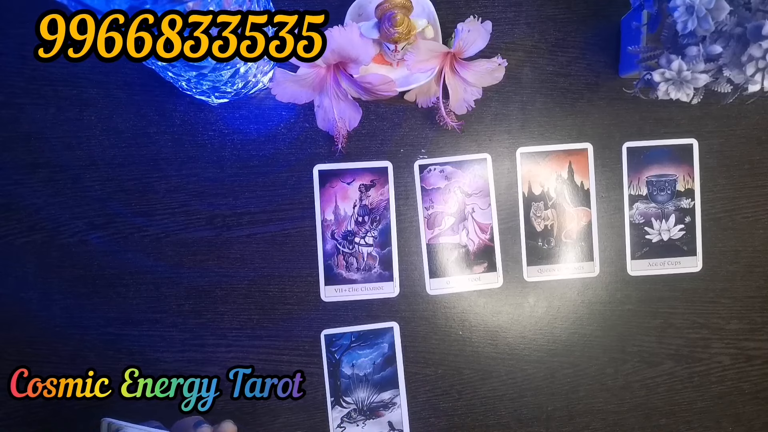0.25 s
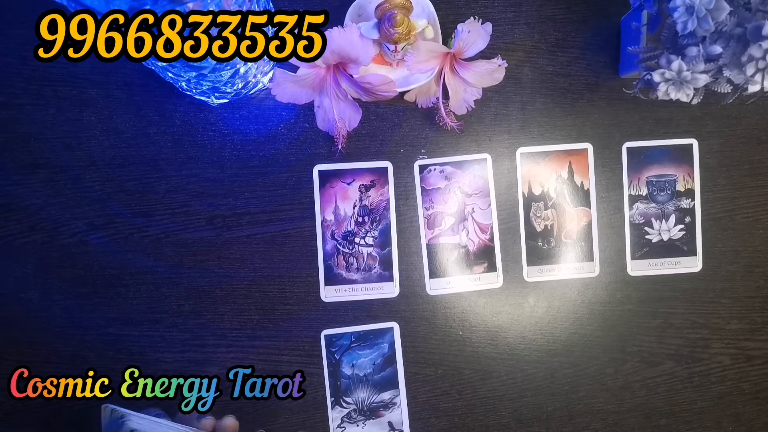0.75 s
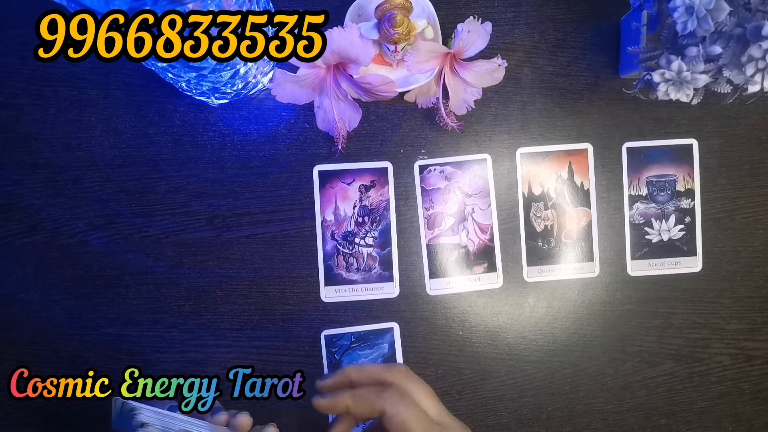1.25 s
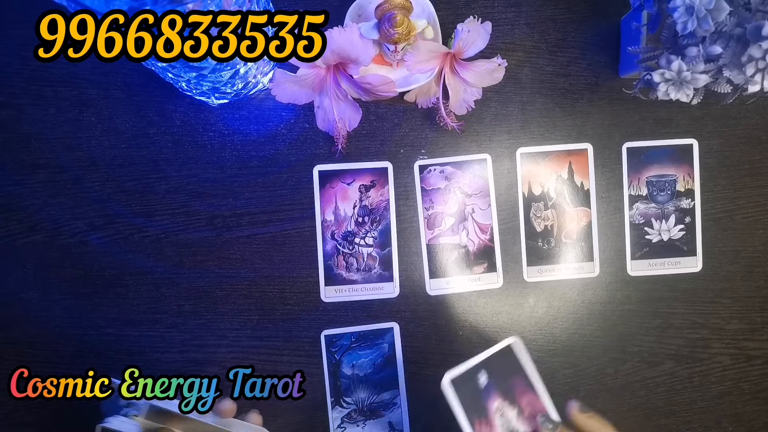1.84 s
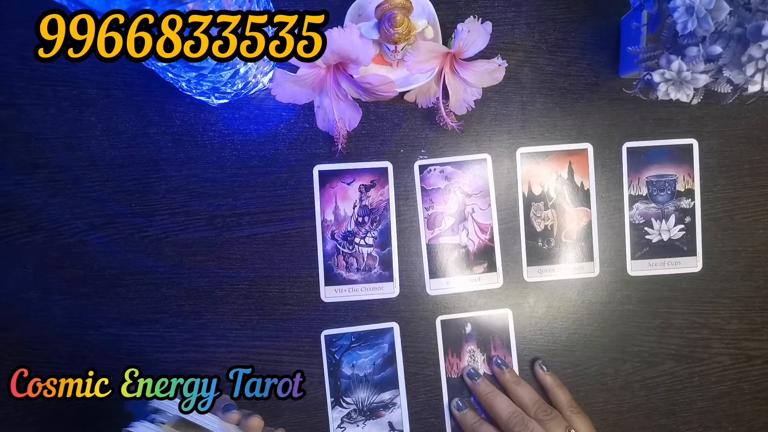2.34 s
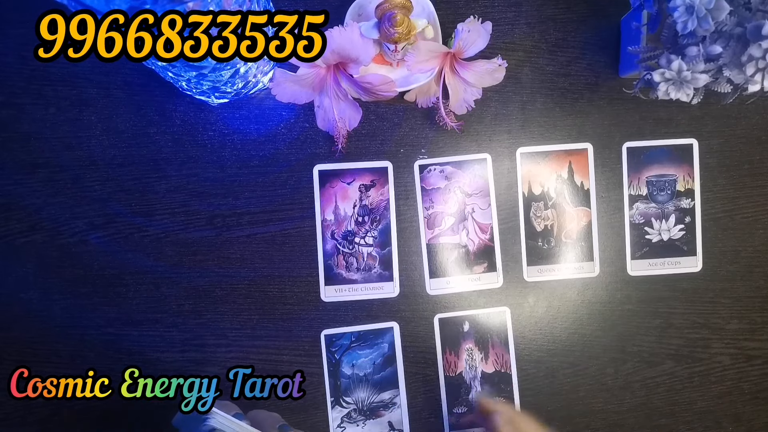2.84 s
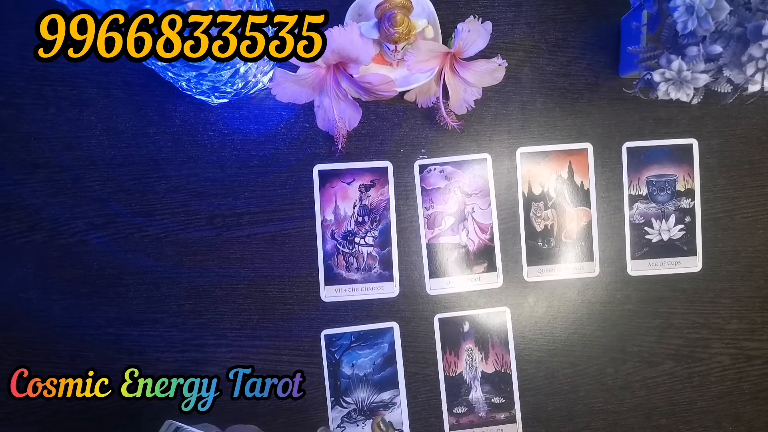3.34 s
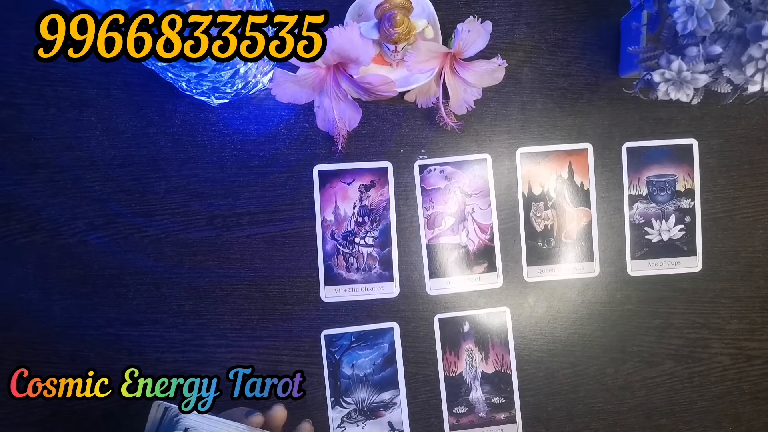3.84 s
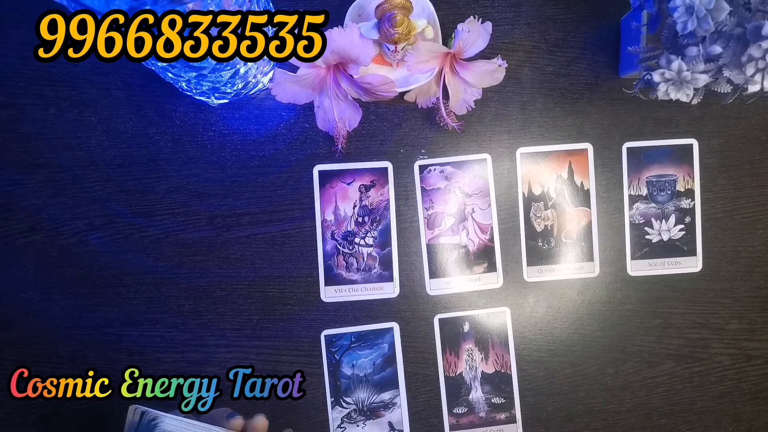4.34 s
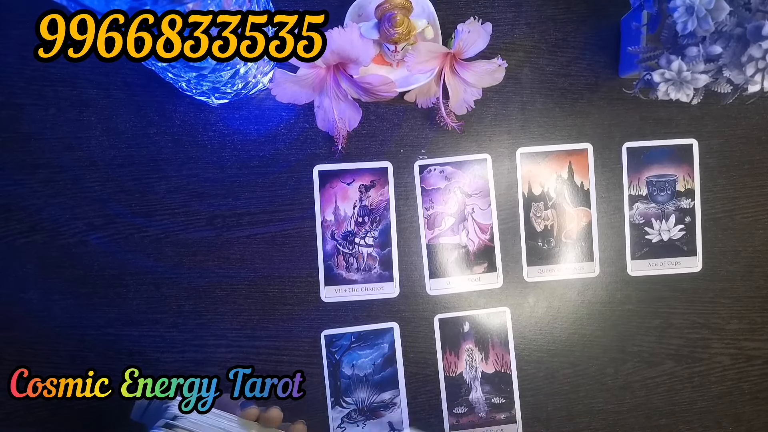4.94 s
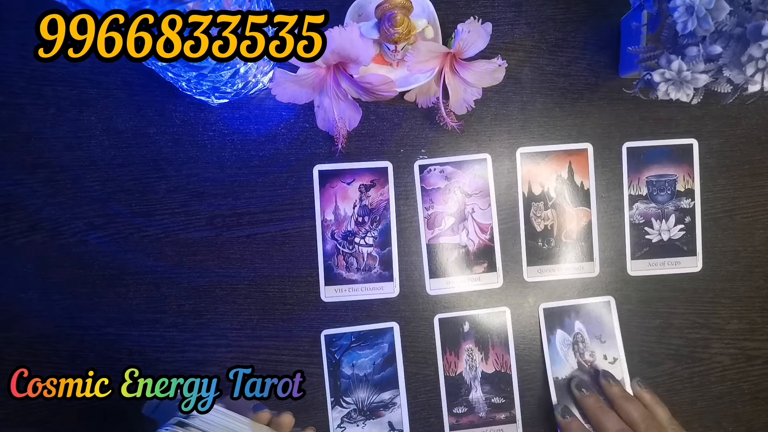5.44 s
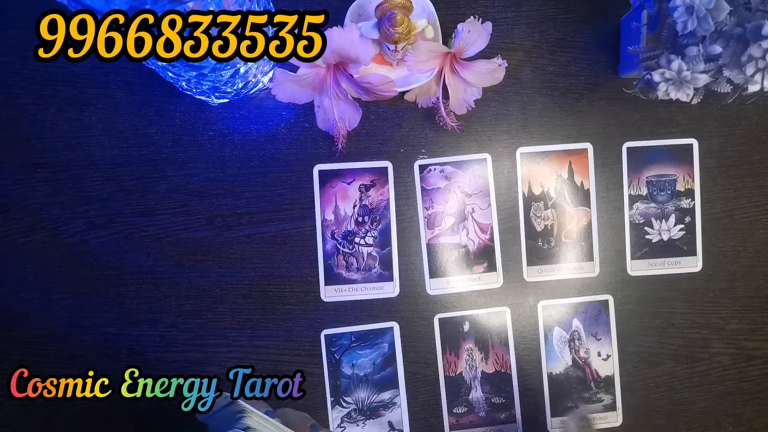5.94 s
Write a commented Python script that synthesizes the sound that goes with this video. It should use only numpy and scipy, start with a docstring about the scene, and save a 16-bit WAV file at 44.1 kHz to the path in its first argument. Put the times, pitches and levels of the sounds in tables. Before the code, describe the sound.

In a small room, a faint ceiling fan rushes steadily while its draught buffets a close stereo microphone with low, fluttering thumps, stronger on the right. A sharp card snap comes early with a papery slide, then lighter snaps and scrapes on a wooden table, another crisp pair near the five-second mark, and a few soft ones before only fan and draught remain.

```python
"""A ceiling fan hums and rushes throughout; from the first moments its draught hits two microphone ports.
The puffs are short pressure swings over a patter of small eddies, mostly stronger in the right port.
Soon playing cards slide (gritty noise through resonances) and snap (short noise bursts ringing the card)
on a wooden table in a small room, on and off until near the end. Fan and draught then carry on alone."""
import sys
import numpy as np
from scipy import signal
from scipy.fft import rfft, irfft
from scipy.io import wavfile
from scipy.ndimage import uniform_filter1d

SR = 44100
rng = np.random.default_rng(int(sys.argv[2]) if len(sys.argv) > 2 else 0)


def wav_record(signal):
    """Record a signal, one row per channel, as 16-bit PCM in the file named by sys.argv[1]."""
    frames = np.transpose(np.atleast_2d(signal))
    bounded = np.clip(frames, -1, 1)
    # unit amplitude maps onto the largest positive 16-bit level
    quanta = np.round(bounded * 32767).astype(np.int16)
    wavfile.write(sys.argv[1], SR, quanta)


N = 273420  # length in samples

# Shape of the fan's air rush, before its overall level is set: pitch_hz, level_db (per Hz)
FAN_RUSH = [(24, -46), (40, -16.5), (288, -2), (630, -3), (849, -3.5), (1070, -12), (1280, -10),
            (1940, -10.5), (2230, -8.5), (7190, -22), (9690, -36), (12600, -66.5), (21300, -120)]
# Humps added to the rush: pitch_hz, width_hz, level_db
FAN_HUMPS = [(383.2, 11, 6), (901, 220, 6.5), (1275, 218, 9.5), (2246, 210, 6)]
# How alike the rush is at both ports: pitch_hz, likeness (0 to 1, no unit)
FAN_LIKENESS = [(60, 0), (140, 0.29), (320, 1), (740, 0.889), (1720, 0.12), (3990, 0.0059), (9240, 1)]
# Which side of the rush is louder: pitch_hz, left_minus_right_db
FAN_BALANCE = [(60, -3.5), (160, -1), (450, -3), (1230, -2.0), (3370, -3), (9240, -2)]
# Motor tones of the fan: pitch_hz (average), level_db (rms)
MOTOR_TONES = [(592.2, -81), (888.2, -83.5), (1287, -85.5), (2261, -83.5)]
FAN_DB = -65  # rms level of the rush

# Gusts that carry small eddies: start_s, end_s, left_level_db, right_level_db
GUSTS = [(0.154, .35, -54, -51), (0.402, 0.477, -55.5, -51), (0.554, 0.582, -60, -52.5),
         (.67, 0.775, -52, -53), (.88, 1.147, -63.5, -54.5), (1.276, 1.493, -56.5, -52.5),
         (1.636, 1.785, -58, -54), (1.952, 2, -53, -50.5), (2.096, 2.259, -54.5, -44.5),
         (2.338, 2.434, -63, -48), (2.457, 2.711, -53, -48.5), (2.842, 2.987, -59, -52),
         (3.037, 3.17, -57.5, -55.5), (3.354, 3.454, -59, -45.5), (3.483, 3.652, -60.5, -59),
         (3.742, 3.928, -60.5, -57.5), (4.112, 4.221, -59, -51), (4.321, 4.751, -57, -54.5),
         (4.898, 4.988, -58.5, -52), (5.179, 5.335, -54, -50.5), (5.373, 5.6, -57, -52),
         (5.622, 5.775, -55, -43), (5.82, 5.946, -51, -56), (6.157, 6.3, -64, -57)]
# Strong eddies striking a port: middle_s, port (0 left, 1 right), level_db, pitch_hz (at the middle),
# length_ms (a third of the whole swing)
PUFFS = [(0.147, 1, -38, 164, 7.5), (0.185, 1, -29.5, 203.5, 6.84), (0.327, 1, -25, 232, 4.8),
         (0.44, 0, -44, 169, 7), (0.474, 1, -38, 185, 5.7), (0.675, 1, -26, 188, 1.8),
         (0.684, 1, -17, 210.4, 16), (0.728, 0, -36, 146.4, 8.2), (0.742, 0, -35.5, 151, 9.3),
         (0.945, 1, -17, 182, 6.5), (0.953, 1, -22, 154.5, 6.1), (0.977, 1, -33.5, 143, 30),
         (0.989, 1, -28, 196, 6.3), (1.063, 1, -35.5, 190, 7.3), (1.076, 1, -40.5, 166, 6.76),
         (1.131, 1, -41, 156, 16), (1.27, 1, -34, 158, 13), (1.288, 0, -41, 207, 5.5),
         (1.358, 1, -27, 199, 9.7), (1.373, 1, -32.5, 120, 11.3), (1.404, 1, -30, 197, 4.4),
         (1.661, 0, -36.5, 160, 7.7), (1.795, 1, -39, 202, 5.6), (1.966, 0, -42, 162, 10),
         (2.113, 1, -20.5, 241, 4.3), (2.133, 1, -20.5, 236.4, 4.4), (2.208, 1, -21.5, 149.3, 10.3),
         (2.219, 1, -35, 163, 13), (2.244, 1, -21, 217.3, 4.4), (2.38, 1, -33.5, 197, 8.2),
         (2.405, 1, -35, 228.5, 10.6), (2.46, 1, -31.5, 190, 4.8), (2.472, 1, -31, 180, 5.7),
         (2.494, 1, -20, 232, 2.52), (2.554, 0, -42, 159, 12), (2.64, 1, -29, 210, 6.4),
         (2.694, 1, -29, 227, 6), (2.795, 1, -30, 185.8, 6.7), (2.943, 1, -27.5, 167.8, 30),
         (2.966, 1, -13.5, 246, 6.3), (2.969, 0, -31, 149, 5.8), (3.099, 1, -31, 187, 8.85),
         (3.116, 1, -35, 194.6, 7.6), (3.335, 1, -39, 210, 6), (3.355, 1, -26, 148.5, 6.1),
         (3.365, 1, -10, 199, 3.9), (3.385, 1, -32, 287, 6.2), (3.402, 0, -37.5, 170, 11),
         (3.413, 1, -18.5, 200.8, 6.2), (3.425, 1, -26, 187, 13), (3.499, 0, -38.5, 140, 7.4),
         (3.774, 0, -29.5, 169.3, 7), (3.79, 1, -30.5, 199, 7.7), (3.812, 1, -35.5, 140, 7.8),
         (3.907, 1, -33.5, 176, 7.1), (4.095, 0, -41, 151, 8.6), (4.136, 1, -31, 157, 6.3),
         (4.193, 1, -36.5, 197, 6), (4.203, 1, -27.5, 193, 5.8), (4.211, 1, -21.5, 147, 8.5),
         (4.327, 1, -29.5, 167, 8), (4.335, 0, -39.5, 150, 8), (4.445, 0, -31, 185, 5.7),
         (4.531, 0, -38.5, 180, 5.1), (4.558, 1, -35.5, 167, 5.34), (4.613, 0, -30.5, 166, 8.3),
         (4.616, 1, -34, 240, 4.6), (4.684, 1, -41.5, 200, 5.7), (4.921, 1, -39.5, 260, 8.7),
         (4.982, 1, -24, 213, 5.04), (5.177, 1, -34, 162, 15), (5.198, 1, -36, 171, 5),
         (5.223, 0, -34.5, 186.4, 8.3), (5.288, 0, -40, 150, 10), (5.323, 1, -21.5, 200, 4.8),
         (5.435, 1, -40.5, 211, 8.2), (5.503, 0, -32, 140, 11), (5.503, 1, -26, 154, 8.5),
         (5.526, 1, -20.5, 170, 6.3), (5.574, 1, -35.5, 178, 5.7), (5.621, 0, -34.5, 147, 10),
         (5.634, 1, -33.5, 163.6, 8.4), (5.667, 1, -20.5, 212.7, 4.98), (5.715, 1, -26.5, 210, 4.7),
         (5.733, 1, -23.5, 204.4, 7.4), (5.74, 1, -20.5, 221, 4), (5.754, 1, -28.5, 189.5, 6.8),
         (5.775, 0, -38, 180, 10.4), (5.842, 1, -14.5, 267, 3.05), (5.872, 1, -35, 221, 4.26),
         (5.928, 1, -24, 222.8, 5.47), (5.934, 0, -38.5, 160, 6.7), (6.184, 0, -35, 143, 10.3),
         (6.194, 1, -29, 275, 7.4)]
GUST_EDGE_DB_PER_S, LULL_DB = 356, -70.5  # how steeply gusts come and go; level between them
OCTAVE_DB = -16.5  # octave above each strong puff, which makes its crest pointed

# How fast the room's echo dies: pitch_hz, time_to_fall_60_db_s
ROOM_DECAY = [(500, .2), (1500, 0.1443), (4000, 0.0694), (9000, 0.23)]
# Resonances of the table top and its reflections: pitch_hz, width_hz (at least 70 is used), level_db
TABLE_RESONANCES = [(1400, 66, -18.5), (1800, 100, 2.5), (2087, 9.1, -4.5), (2500, 55, -6.5), (2650, 43, 0),
                    (3050, 100, -1.5), (3960, 58, 0), (4210, 54, -19), (4500, 17, -11.5), (4920, 65, -5),
                    (5400, 74, -6), (6100, 26, -8)]
# How the housing shades near sounds at the ports: pitch_hz, left_minus_right_db
PORT_SHADING = [(60, -4.5), (140, -9.5), (320, -2), (740, 2), (1720, -3), (3990, -8.5), (9240, -1.5)]

# Card faces sliding, before the table and room: peak_s, level_db, rise_s, fall_s,
# roundness (no unit; under 1 a jab, over 1 a long even stroke), middle_hz, edge_hz,
# and relative to the middle: body_db, edge_db (at the peak), rustle_db
SLIDES = [ (0.72, -71.5, 0.027, 0.098, 0.83, 2760, 7100, 8.5, 7, 8),
          (0.815, -40, .04, 0.18, 0.69, 2300, 5750, -7.5, -17, 4.5),
          (0.995, -56.5, .12, 0.084, 1.5, 3250, 6130, -10.5, -11, 0),
          (1.4, -52.5, 0.039, 0.2, 0.45, 2990, 5000, -9, -8.5, -5),
          (1.708, -45, 0.054, 0.087, .7, 1950, 3900, 1, -5, -1),
          (1.745, -58, 0.0219, 0.11, 0.67, 3960, 5800, 3, 6.5, 8.5),
          (1.83, -79.5, 0.12, 0.26, 1, 2500, 7000, -11.5, 15.5, -1),
          (2.136, -54.5, 0.063, .12, 1.09, 2950, 6500, 1, -8, -3),
          (2.281, -45.5, .06, 0.086, 0.88, 4240, 6930, -7.5, -11, 3),
          (2.78, -56.5, .03, .15, 0.75, 2670, 6100, -2.5, -28, -4),
          (3.105, -62.5, 0.051, 0.1, 2, 4080, 5900, 1, 4.5, 9),
          (3.451, -65, 0.062, 0.14, 0.96, 3100, 6000, -12, -13, -8),
          (3.93, -68, 0.058, 0.09, 1.8, 3700, 6100, 0.5, -21, -6),
          (4.07, -70, 0.087, .08, 1.5, 2900, 6000, -8, -14, -7),
          (4.34, -78, 0.16, .15, 0.96, 2500, 6230, 1, 7, 5),
          (4.469, -66.5, 0.041, 0.095, 1.7, 3480, 6080, -21, 8, 6.5),
          (4.69, -67.5, 0.095, 0.092, 0.94, 2420, 6700, -7, -5, 1),
          (4.85, -47.5, 0.0093, .1, 0.42, 3630, 5400, 8, 0, 8.5),
          (4.912, -44, 0.082, 0.1147, 0.64, 3430, 5500, -4, -4, 9),
          (5.398, -54, 0.027, 0.14, .6, 3060, 6200, -15, 2, -4.5),
          (5.561, -52.5, 0.034, 0.068, 0.96, 3600, 5900, -20, -24, -11),
          (5.631, -51, 0.064, .1, 0.58, 3200, 6830, -7.5, 6, 7)]
STROKE_DB = -32.5  # a stroke swells from and dies to this far under its peak
BRIGHTEN_DB = 5  # the edge ring gains this much from start to peak, and again from peak to end

# Card edges snapping free or tapping down, before the table and room: start_s, level_db, bend_hz,
# body_db and edge_db (relative to the bend), length_ms (time to fall 20 dB, before ringing),
# left_lag_ms (negative: left is earlier)
SNAPS = [ (0.808, -6.5, 2650, -21, -9, 2.89, -.16), (0.8107, -5.5, 2110, -8, -8, 2.37, -0.13),
         (0.8112, -15.5, 4190, -25, -5, 3.7, -0.18), (0.817, -25, 545, -20, -21, 14, -0.084),
         (0.8191, -15.5, 3420, -17, -4.5, 2.7, -0.18), (1.399, -38, 3050, -11.5, -3.5, 3.3, -0.068),
         (1.706, -34.5, 3900, 2, -14, 3.9, -0.092), (1.706, -18.5, 1873, -27, -34.5, 1.8, -0.082),
         (1.747, -35.5, 3650, -1, 3, 1.1, -0.11), (2.1166, -21, 3140, -1, -29, 1.76, 0.037),
         (2.135, -22, 3080, -1.5, -24.5, 1.7, 0.033), (2.168, -37.5, 3090, -16, -10, 1.2, .05),
         (2.2554, -28, 4000, -15, -22.5, 2.2, 0.047), (2.266, -33.5, 4840, -15.5, -26, 4.9, -0.03),
         (2.276, -30, 4810, -26, -6, 4.3, 0.055), (2.284, -22.5, 4500, -11.5, -4, 2.3, -0.0018),
         (2.29, -38.5, 3380, -4.5, -7.5, 6.5, 0.053), (2.781, -41, 2360, -5, -7, 2.2, 0.09),
         (3.089, -40, 3750, -3, 3.5, 2.9, 0.026), (4.451, -41.5, 3680, -6, -2, 1.6, -0.13),
         (4.465, -44.5, 3600, -3, 4, 1.9, -.12), (4.849, -20.5, 1100, -12, 1.5, 1.18, -0.14),
         (4.849, -23, 3200, -14, 7, 0.75, -0.084), (4.9104, -19.5, 2740, -0.5, -5, 1.99, -0.083),
         (4.9119, -13, 3800, 0.3, -4, 1.8, -.15), (5.398, -33.5, 3220, -17, -1.5, 2, 0.042),
         (5.557, -37, 3250, -26, -15, 6.8, 0.08), (5.634, -27.5, 4590, -31.5, 5, 2.3, 0.15),
         (5.634, -31, 3050, -27, 1, 4.9, 0.093)]
BODY_HZ, EDGE_RATIO = 1447, 1.617  # the flat face keeps its pitch; the edge rings above the bend
CRACK_DB, CRACK_PER_DB = -1.5, 0.4  # the broad crack under the ring grows with the force
DAMPING_AT_2MS, DAMPING_POWER = 1.25, 0.6  # short snaps ring over a wider band

HISS_DB, BAND_LIMIT_HZ = -90.5, 15000  # hiss level before the last band limit


def gain_of(db):
    """Turns decibels into a plain multiplier."""
    return 10 ** (np.asarray(db) / 20)


def evened(x):
    """Scales a signal so that its average strength (rms) is 1."""
    return x / np.sqrt(np.mean(x ** 2) + 1e-20)


def read(points, hz):
    """Reads a table between its points, with pitch spaced as the ear hears it (log)."""
    f, value = np.transpose(points)
    return np.interp(np.log(hz + 1), np.log(f + 1), value)


def add(mix, s, sound):
    """Mixes a sound in, starting at s seconds."""
    part = mix[..., round(s * SR):][..., :sound.shape[-1]]
    part += sound[..., :part.shape[-1]]


def lagged(x, ms):
    """Delays a sound by a fraction of a millisecond, by turning the phase of each frequency."""
    hz = np.fft.rfftfreq(len(x), 1 / SR)
    return irfft(rfft(x) * np.exp(-2j * np.pi * hz * ms / 1000), len(x))


def resonate(x, hz, width):
    """A steep resonance: shifts pitch hz down to zero, smooths twice, and shifts back."""
    turn = np.exp(2j * np.pi * np.cumsum(hz * np.ones(x.shape[-1])) / SR)
    r = np.exp(-np.pi * width / SR)
    smooth = signal.lfilter([(1 - r) ** 2], [1, -2 * r, r ** 2], x / turn)
    return 2 * (turn * smooth).real


def fan_rush():
    """Moving air makes broad noise, partly alike at the two ports, with slight patches in level."""
    frames, hz = N // 256 + 5, np.fft.rfftfreq(1024, 1 / SR)
    a, b, c, d, patches = rng.standard_normal((frames, 513, 5)).T
    patches = uniform_filter1d(patches, 12, 0)  # smooth across pitch
    patches = evened(uniform_filter1d(patches, 14, 1))  # and across time
    same = np.clip(read(FAN_LIKENESS, hz), -1, 1)[:, None]
    left, other = a + 1j * b, c + 1j * d
    right = same * left + np.sqrt(1 - same ** 2) * other
    side = gain_of(read(FAN_BALANCE, hz)[:, None] / 2)
    z = np.array([left * side, right / side])
    humps_db = sum(db * np.exp(-(2 * (hz - f) / width) ** 2) for f, width, db in FAN_HUMPS)
    z *= gain_of((read(FAN_RUSH, hz) + humps_db)[:, None] + 1.2 * patches)
    rush = signal.istft(z, nperseg=1024, noverlap=768)[1][:, :N]
    return gain_of(FAN_DB) * evened(rush)


def fan_motor():
    """Faint steady tones from the motor, all wavering together in pitch."""
    waver = 1 + 0.004 * evened(uniform_filter1d(rng.standard_normal(N), 4000))
    turns = np.cumsum(waver) / SR
    return sum(gain_of(db) * np.sqrt(2) * np.sin(2 * np.pi * f * turns) for f, db in MOTOR_TONES)


def eddy(hz, ms, octave_db, phase):
    """A pressure swing with pointed crests, falling in pitch as the eddy leaves the port."""
    u = np.linspace(-3, 3, round(3 * ms * SR / 1000))
    t = u * ms / 2000  # seconds from the middle
    fade = np.where(u < 0, 2.425 * u ** 2, 0.66 * abs(u) ** 2.47)
    shape = gain_of(-6.5 * fade) * signal.windows.tukey(len(u), 0.5)
    angle = 2 * np.pi * hz * (t - 12.0 * t ** 2) + phase
    octave = gain_of(octave_db) * shape * np.cos(2 * angle - 0.5)
    swing = shape * (np.cos(angle) + octave)
    return swing - shape * swing.sum() / shape.sum()  # no net push remains


def draught_db():
    """Each gust swells out of the lull, holds and dies away, at each port."""
    t = np.arange(0, N / SR + 0.01, 0.005)
    start, end, *ports_db = np.transpose(GUSTS)[..., None]
    outside = np.maximum(np.maximum(start - t, t - end), 0)  # seconds outside each gust
    gusts_db = np.array(ports_db) - GUST_EDGE_DB_PER_S * outside
    levels = np.maximum(gusts_db.max(axis=1), LULL_DB)
    return [np.interp(np.arange(N) / SR, t, db) for db in levels]


def eddy_patter():
    """Many small eddies strike one port at random, about 200 a second, in 12 pitches and uneven sizes."""
    size = gain_of(3.5 * np.minimum(rng.exponential(1, N), 3)) * (rng.random(N) < 200 / SR)
    kind = rng.integers(0, 12, N)
    patter = np.zeros(N)
    for k, hz in enumerate(np.geomspace(85, 300, num=12)):
        one = eddy(hz, 1100 / hz, -7.5, 7 * rng.random())
        patter += signal.oaconvolve(size * (kind == k), one)[:N]
    return evened(patter)


def wind():
    """The draught presses on each port: single strong puffs over its own random patter of eddies."""
    out = np.zeros((2, N))
    phases = 1.21 + 0.67 * rng.standard_normal(len(PUFFS))  # most puffs push first, then pull
    for (s, port, db, hz, ms), phase in zip(PUFFS, phases):
        add(out[round(port)], s - 1.5 * ms / 1000, gain_of(db) * eddy(hz, ms, OCTAVE_DB, phase))
    for port, db in zip(out, draught_db()):
        add(port, 0, gain_of(db) * eddy_patter())
    return out + gain_of(-30.5) * out[::-1]  # a little of each port leaks to the other


def room(x):
    """Walls send back sparse echoes: random-sign taps, one in every 20 samples, fading by pitch."""
    taps = np.zeros((2, SR // 2))
    at = np.arange(120, SR // 2 - 20, 20)
    at = at + rng.integers(0, 20, (2, len(at)))
    np.put_along_axis(taps, at, rng.choice([-1., 1.], at.shape), 1)
    hz, t, z = signal.stft(taps, SR, nperseg=256)
    fading = gain_of(-60 * t / read(ROOM_DECAY, hz)[:, None])
    tail = signal.istft(z * fading, SR, nperseg=256)[1]
    return signal.fftconvolve(x, tail / np.linalg.norm(tail[0]), axes=1)[:, :N]


def tabletop(x):
    """The table's resonances colour near sounds, and the housing shades each port."""
    hz = np.fft.rfftfreq(N, 1 / SR)
    modes = 1 + sum(gain_of(db) / (1 + 2j * (hz - f) / max(width, 70)) for f, width, db in TABLE_RESONANCES)
    small = (1j * hz / 450 / (1 + 1j * hz / 450)) ** 3  # a card is too small to radiate bass
    half_db = read(PORT_SHADING, hz) / 2
    return irfft(rfft(x) * modes * small * gain_of([half_db, -half_db]), N)


def slide(s, db, rise_s, fall_s, roundness, middle_hz, edge_hz, body_db, edge_db, rustle_db):
    """Coated paper rubbing: dense grit of uneven size rings the card under a swelling stroke."""
    t = np.arange(-rise_s, fall_s, 1 / SR)
    u = np.where(t < 0, t / rise_s, t / fall_s)  # -1 at the start, 0 at the peak, 1 at the end
    grit = rng.standard_normal((2, len(t))) * gain_of(2.0 * rng.exponential(1, len(t)))
    # a wide source is only partly alike at both ports
    grit[0] = 0.68 * lagged(grit[1], -0.0637) + 1.2 * grit[0]
    rings = ((body_db, 1300, 1100), (0, middle_hz, 1000),
             (edge_db + BRIGHTEN_DB * u, edge_hz, 1600), (rustle_db, 4300, 5000))
    sound = sum(gain_of(rel_db) * evened(resonate(grit, hz, width)) for rel_db, hz, width in rings)
    stroke = gain_of(db + STROKE_DB * abs(u) ** roundness)
    return s - rise_s, sound * stroke * signal.windows.tukey(len(t), 0.15)


def snap(s, db, bend_hz, body_db, edge_db, ms, lag_ms):
    """A short burst of cracks as the edge lets go, ringing the bent card."""
    t = np.maximum(np.arange(2048) / SR * 1000 - 4, 0)  # ms, after 4 ms of silence
    ms = max(ms, 0.3)
    shape = np.minimum(t / 0.4, 1) * gain_of(-20 * t / ms)
    burst, hz = rfft(rng.standard_normal(len(t)) * shape), np.fft.rfftfreq(len(t), 1 / SR)
    damping = DAMPING_AT_2MS * (2 / ms) ** DAMPING_POWER
    rings = ((body_db, BODY_HZ, 500), (0, bend_hz, 700), (edge_db, EDGE_RATIO * bend_hz, 900),
             (CRACK_DB + CRACK_PER_DB * db, 3500, 3500))
    sound = np.zeros(len(t))
    for rel_db, f, width in rings:
        part = irfft(burst / (1 + 1j * (hz - f) / (width * damping)) ** 4)
        # every ring gets the same energy before its own level
        sound += gain_of(db + rel_db) * part * np.linalg.norm(shape) / np.linalg.norm(part)
    return s - 0.004, np.array([lagged(sound, lag_ms), sound])


def playing_cards():
    """All snaps and slides of the cards, coloured by the table they touch."""
    cards = np.zeros((2, N))
    for row in SNAPS:
        add(cards, *snap(*row))
    for row in SLIDES:
        add(cards, *slide(*row))
    return tabletop(cards)


def scene():
    """Cards heard directly and through the room, over the fan and its draught."""
    cards = playing_cards()
    background = fan_rush() + fan_motor() + wind()
    return background + gain_of(-11.5) * room(cards) + gain_of(-5.5) * cards


def record(dry):
    """The microphone drops deep bass and fades steeply above its top; faint hiss; then the band limit."""
    low_hz, top_hz = 95, 9400
    thinned = signal.sosfilt(signal.butter(2, low_hz, "high", fs=SR, output="sos"), dry)
    dulled = signal.sosfilt(signal.butter(8, top_hz, "low", fs=SR, output="sos"), thinned)
    hissing = dulled + gain_of(HISS_DB) * rng.standard_normal(dry.shape)
    band_limit = signal.firwin(511, BAND_LIMIT_HZ, window=("kaiser", 9), fs=SR)
    return signal.oaconvolve(hissing, band_limit[None], "same")


dry = scene()
out = record(dry)
wav_record(out)
```